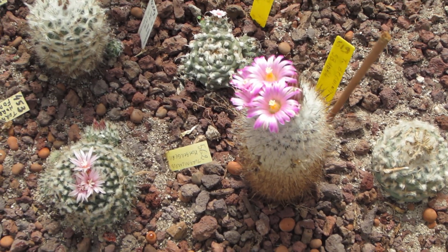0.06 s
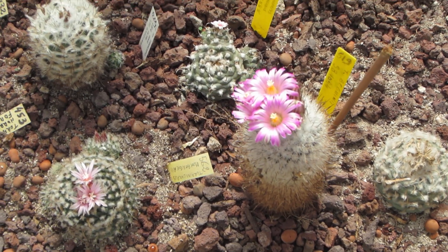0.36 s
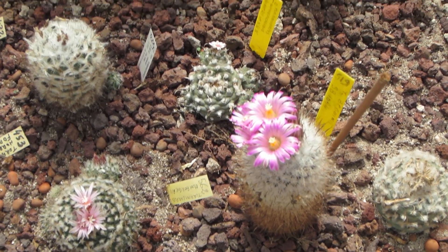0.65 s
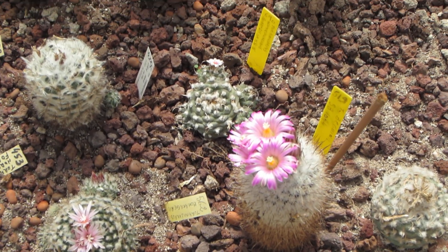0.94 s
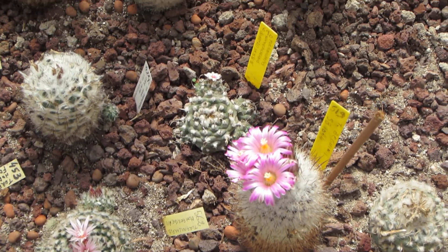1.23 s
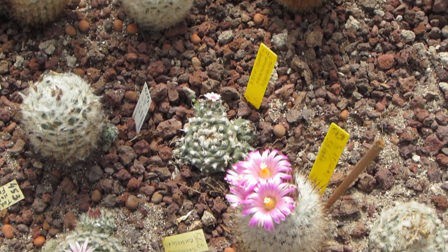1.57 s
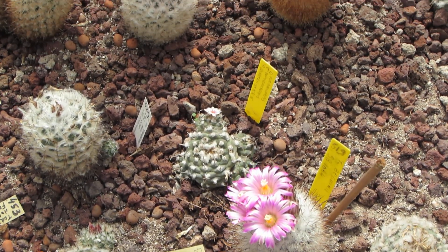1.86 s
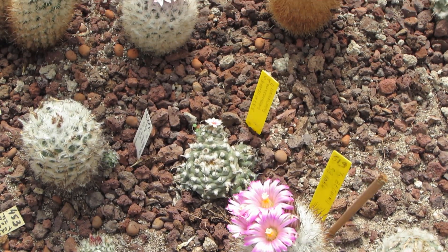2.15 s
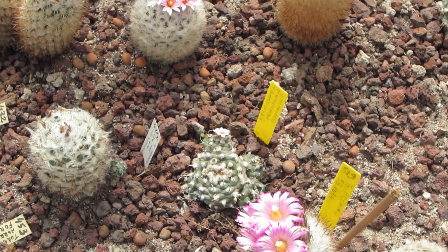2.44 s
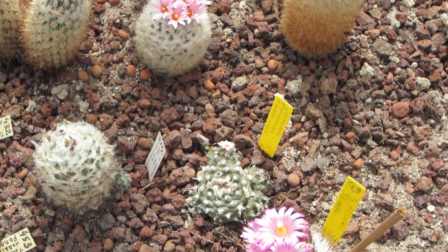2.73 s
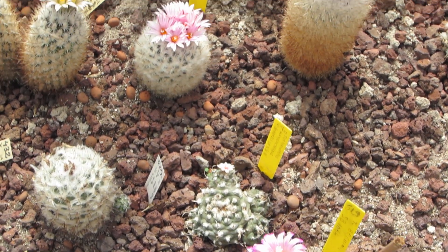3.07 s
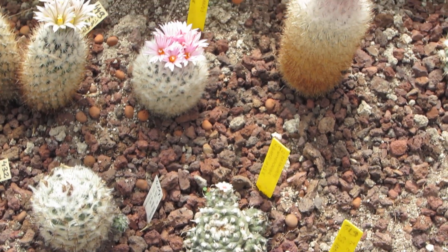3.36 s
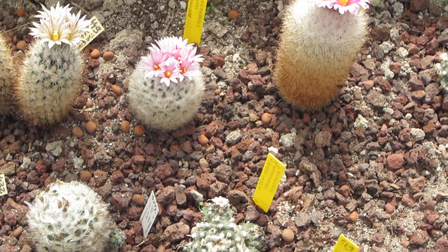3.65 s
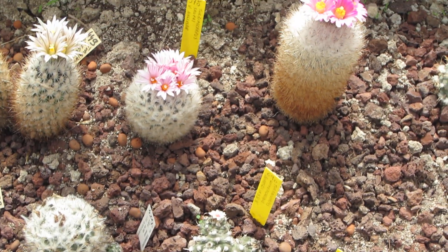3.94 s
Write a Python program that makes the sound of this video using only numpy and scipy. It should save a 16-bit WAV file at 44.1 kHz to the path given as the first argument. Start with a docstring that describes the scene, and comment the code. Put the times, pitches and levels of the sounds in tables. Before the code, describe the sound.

Low engine drone through greenhouse walls, with soft ventilation hiss, two knocks and faint ticks.

```python
"""Two engines drone through the walls of a quiet greenhouse, slowly gaining speed: low firing tones
over a rumble. Inside, ventilation hisses softly with a few fan tones. Something knocks twice further
off in the hall, a crack and a hollow ring, and tiny dry ticks sound close to the microphone.
Soft taps, one deep bump, a faint squeak and the hiss of the electronics fill in the quiet."""
import sys
import numpy as np
from scipy import signal
from scipy.fft import rfft, irfft
from scipy.io import wavfile

SR = 44100
rng = np.random.default_rng(int(sys.argv[2]) if len(sys.argv) > 2 else 0)


def transcribe(signal):
    """Save signal, clipped to [-1, 1], as a 16-bit WAV file at the path in sys.argv[1]."""
    frames = np.atleast_2d(signal).T
    limited = np.clip(frames, -1, 1)
    pcm = np.round(limited * 32767).astype(np.int16)
    wavfile.write(sys.argv[1], SR, pcm)


N = 176400
T = np.arange(N) / SR


def from_db(db):
    """Decibels to gain."""
    return 10 ** (np.asarray(db) / 20)


def unit_rms(x):
    """Scale to an RMS level of 1."""
    return x / np.sqrt(np.mean(x ** 2) + 1e-20)


def in_time(rows):
    """Join timed breakpoints by straight lines: one curve per value column."""
    times, *columns = np.transpose(rows)
    return [np.interp(T, times, column) for column in columns]


def at_hz(points, hz):
    """Read a curve on a log-frequency axis."""
    point_hz, values = np.transpose(points)
    return np.interp(np.log(hz), np.log(point_hz), values)


def drift(rate_hz):
    """A smooth random wobble with a spread of 1."""
    step = 40  # samples per control point
    pole = np.exp(-2 * np.pi * rate_hz * step / SR)
    white = rng.standard_normal(N // step + 2002)
    slow = signal.lfilter([1], [1, -2 * pole, pole * pole], white)[2000:]
    return np.interp(np.arange(N) / step, np.arange(len(slow)), unit_rms(slow))


def noise(colour):
    """Unit-level stereo noise of a given colour: centred in the bass, wide in the treble."""
    # how alike the two ears are: frequency_hz, correlation
    likeness = [(60, 0.95), (150, 0.75), (320, 0.59), (700, 0.69), (1400, 0.14), (2800, 0), (12000, 0)]
    # boost on the left and equal cut on the right: frequency_hz, gain_db
    lean = [(60, 1.5), (130, 1), (350, -0.9), (700, 1.1), (2400, 0.85), (4400, 1.5), (8000, -0.7),
            (15000, -0.3)]
    hz = np.maximum(np.arange(N // 2 + 1) * SR / N, 1)
    skirts = np.minimum(hz / colour[0][0], 1) ** 2 * np.minimum(colour[-1][0] / hz, 1) ** 2
    alike = at_hz(likeness, hz)
    mid, side = rfft(rng.standard_normal((2, N)))
    pair = np.sqrt(1 + alike) * mid + np.sqrt(1 - alike) * side * [[1], [-1]]
    eq = from_db(at_hz(colour, hz) + at_hz(lean, hz) * [[1], [-1]])
    return unit_rms(irfft(pair * skirts * eq, N))


def tone(hz):
    """A unit-level sine on a steady pitch or a pitch curve."""
    cycles = np.cumsum(hz + np.zeros(N)) / SR + rng.random()
    return np.sqrt(2) * np.sin(2 * np.pi * cycles)


def burst(start_s, attack_s, hold_s, t60_s):
    """Envelope: rise, hold, exponential decay."""
    age = np.maximum(T - start_s, 0)
    decay_db = np.maximum(-60 * np.maximum(age - hold_s, 0) / t60_s, -200)
    return (1 - np.exp(-age / attack_s)) * from_db(decay_db)


def microphone_noise():
    """Hiss and thin whines of the electronics."""
    # hiss spectrum: frequency_hz, relative_db
    hiss_colour = [(2500, 1), (4000, 1.5), (5800, 0.5), (6800, -7.5), (7900, -18), (9300, -6.5), (11500, 0),
                   (15500, 0.5)]
    # steady whines: pitch_hz, level_db
    whines = [(7867, -112), (15734, -94)]
    return from_db(-77) * noise(hiss_colour) + sum(from_db(db) * tone(hz) for hz, db in whines)


def ventilation():
    """A bed of soft rushing air with a few unsteady fan tones."""
    # airflow spectrum: frequency_hz, relative_db
    air_colour = [(120, -1.5), (170, 0), (240, 5), (350, -3), (550, -4), (680, -5.5), (770, -4),
                  (830, -6.5), (880, -4), (980, -9.5), (1100, -8.5), (1430, -16), (1630, -13), (1800, -18),
                  (2030, -20), (2200, -23), (2700, -31.5), (3350, -30.5), (3650, -37.5), (6000, -50)]
    # airflow loudness: time_s, level_db
    air_levels = [(0, -58), (1.3, -57.5), (2.1, -57), (2.8, -56.5), (3.6, -55), (4, -55.5)]
    # fan tones: pitch_hz, level_db
    fan_tones = [(424, -78), (499, -74.5), (770, -75), (874, -74.5)]
    fans = 0
    for hz, db in fan_tones:
        gain = from_db(db + 2.5 * drift(5))
        fans = fans + gain * np.array([tone(hz + 3 * drift(10)) for ear in range(2)])
    return noise(air_colour) * from_db(in_time(air_levels)[0]) + fans


def squeak():
    """One faint, brief, wavering high note."""
    return from_db(-83) * tone(3015 + 35 * drift(80)) * burst(3.835, attack_s=.008, hold_s=.09, t60_s=.25)


def bump():
    """A soft, brief swell in the deepest bass."""
    # sub-bass spectrum: frequency_hz, relative_db
    bump_colour = [(22, -4.5), (32, -2.5), (48, -5)]
    return from_db(-41) * noise(bump_colour) * burst(2.23, attack_s=.02, hold_s=.13, t60_s=.34)


def taps():
    """Light contacts further off, each with one broad resonance."""
    # soft taps: start_s, level_db, centre_hz
    tap_hits = [(0.274, -50.5, 710), (.641, -71, 5160), (2.234, -52, 1550), (2.473, -67.5, 4600),
                (3.159, -60, 3900), (3.158, -58, 1240), (3.722, -69, 4400)]
    out, width = 0, 1.247  # frequency ratio from the centre to 3 dB down
    for start_s, db, hz in tap_hits:
        colour = [(hz / width ** 2, -16), (hz / width, -3), (hz, 0),
                  (hz * width, -3), (hz * width ** 2, -24)]
        envelope = burst(start_s, attack_s=.00071, hold_s=.00073, t60_s=.025)
        out = out + from_db(db) * noise(colour) * envelope
    return out


def ticks():
    """Dry close-up clicks, many in pairs; each is three tiny contacts that leave a faint note."""
    # ticks and the weight of their two bands: start_s, low_band_db, high_band_db
    tick_hits = [(.5189, -72, -63), (.6072, -68, -64), (0.6404, -69, -63), (0.935, -64.5, -61),
                 (1.011, -64, -59), (1.2212, -75, -63), (1.3524, -65, -60), (1.4289, -64, -62),
                 (1.767, -67, -63), (1.8463, -67, -62), (2.1865, -67, -63), (2.2763, -66, -64),
                 (2.408, -67, -63), (2.4721, -59.5, -63), (2.6042, -66, -65), (2.6797, -62, -64),
                 (3.0217, -72, -60), (3.098, -65, -67), (3.1571, -59, -63), (3.4384, -70, -69.5),
                 (3.5143, -63, -66), (3.6464, -71, -58), (3.7226, -64, -64), (3.8549, -66, -60),
                 (3.9339, -65, -63)]
    start_s, low_db, high_db = np.transpose(tick_hits)
    spread_s, contact_db, left_db = .0008, -3.5, 1.2
    age = np.arange(2048) / SR
    bands = [signal.butter(2, hz, "band", fs=SR, output="sos") for hz in ((3200, 6460), (8900, 15200))]
    low, high = (signal.sosfilt(np.vstack([sos, sos]), signal.unit_impulse(len(age))) for sos in bands)
    note = np.sin(2 * np.pi * 5300 * age) * from_db(-17 - 60 * age / .018)  # dies in 18 ms
    delays_s = spread_s * (np.arange(3) + .5 * rng.random((len(start_s), 2, 3))) / 3
    onsets = ((start_s[:, None, None] + delays_s) * SR).astype(int)  # tick, ear, contact
    out = 0
    for shape, db in ((low / np.abs(low).max() + note, low_db), (high / np.abs(high).max(), high_db)):
        contacts = np.zeros((2, N))
        for ear in range(2):
            contacts[ear, onsets[:, ear]] = from_db(db + contact_db)[:, None]
        out = out + signal.fftconvolve(contacts, shape[None])[:, :N]
    return out * from_db([[left_db], [-left_db]])


def knocks():
    """Two knocks: a short crack, then a hollow body that swells and dies away in the hall."""
    # knocks: start_s, body_db, crack_db, cutoff_hz, swell_s, hold_s, t60_s, mode_tilt_db_per_octave
    knock_hits = [(1.6014, -41, -50, 14000, 0.019, 0.018, 0.43, -3.5),
                  (2.9626, -47.5, -54, 1050, 0.0025, 0.024, 0.19, 6.5)]
    # resonances of the knocked object: pitch_hz, relative_db
    knock_modes = [(335, -6), (425, 1.5), (497, 0), (585, -8), (650, -3.5), (824, -5)]
    # spectrum of the hollow body and its hall tail: frequency_hz, relative_db
    body_colour = [(150, -12.5), (300, 6.5), (450, 4), (750, -5), (1100, -9.5), (2000, -30.5), (3000, -35),
                   (6000, -48), (14000, -45)]
    # spectrum of the attack: frequency_hz, relative_db
    crack_colour = [(200, -13), (500, -6), (1100, 9), (1500, 3), (2000, 3), (2900, -18.5), (4500, -21),
                    (6200, -17), (8000, -32), (13000, -15), (16000, -24)]
    modes_db, hall_db = -3.5, -13  # against the body
    out, crack, body, hall = 0, noise(crack_colour), noise(body_colour), noise(body_colour)
    for start_s, body_db, crack_db, cutoff_hz, swell_s, hold_s, t60_s, tilt in knock_hits:
        modes = sum(from_db(db + tilt * np.log2(hz)) * tone(hz + 5 * drift(17.9))
                    for hz, db in knock_modes)
        ring = unit_rms(body + from_db(modes_db) * unit_rms(modes))
        ring *= burst(start_s, swell_s, hold_s, t60_s)
        tail = from_db(hall_db) * hall * burst(start_s, attack_s=.018, hold_s=hold_s, t60_s=.9)
        snap = from_db(crack_db) * crack * burst(start_s, attack_s=.00058, hold_s=.011, t60_s=.089)
        hit = from_db(body_db) * (ring + tail) + snap
        softening = signal.butter(2, cutoff_hz, fs=SR, output="sos")  # a softer knock is duller
        out = out + signal.sosfilt(softening, hit + 1e-18)
    return out


def engines():
    """Only the lowest firing harmonics and a rumble pass the walls; each swells and fades on its own."""
    # first engine's speed: time_s, firing_hz
    firing_rates = [(0, 65.02), (.8, 65.9), (1.5, 65.38), (2.4, 66.87), (3.0, 68.44), (3.5, 70.34),
                    (3.75, 71.8), (4, 71.1)]
    # its first three harmonics, a table each: time_s, level_db
    first_levels = [(0.0, -45.5), (0.1, -96), (0.13, -49), (1.14, -37.5), (1.44, -46), (1.77, -44),
                    (1.8, -66), (1.85, -40), (2.14, -38.5), (2.29, -46.5), (2.34, -40.5), (2.65, -36.5),
                    (3.19, -45.5), (3.22, -55), (3.31, -38.5), (3.51, -31.5), (3.64, -36.5), (4.0, -37.5)]
    second_levels = [(0, -72), (.45, -65), (0.619, -54.5), (1.15, -55), (1.4, -60.5), (2.9, -69),
                     (3.3, -51.5), (3.52, -50.5), (3.679, -61.5), (3.82, -48), (4, -60.5)]
    third_levels = [(0, -75), (2.3, -66.5), (2.7, -58.5), (2.93, -52), (3.3, -54.5), (3.55, -55.5),
                    (3.749, -47), (4, -59.5)]
    # the other engine, a single tone: time_s, firing_hz, level_db
    other_engine = [(1.2, 124, -64), (1.55, 122.9, -53), (1.85, 122.6, -48), (2.1, 125.2, -44),
                    (2.42, 126.8, -39), (2.54, 129.4, -46.5), (2.63, 129, -42), (2.78, 131.3, -54.5),
                    (2.9, 134.3, -45.5), (3.05, 136, -68)]
    # rumble spectrum: frequency_hz, relative_db
    rumble_colour = [(15, -12), (26, -2.5), (32, -6), (40, -1.5), (50, 4.5), (65, -3), (88, -3), (105, -9),
                     (135, -9.5), (165, -9.5), (190, -16.5), (350, -32)]
    # rumble loudness: time_s, level_db
    rumble_levels = [(0, -52.5), (.5, -49), (1.3, -46), (1.75, -47.5), (1.92, -47.5), (2.1, -44.5),
                     (2.55, -44.5), (3.22, -45.5), (3.6, -47.5), (4, -44)]
    waver_hz, waver_db, left_db = .2, .4, .55
    firing_hz = in_time(firing_rates)[0] + waver_hz * drift(5.1)
    drone = 0
    for harmonic, levels in enumerate((first_levels, second_levels, third_levels), start=1):
        drone = drone + tone(harmonic * firing_hz) * from_db(in_time(levels)[0] + waver_db * drift(11))
    other_hz, other_db = in_time(other_engine)
    drone = drone + tone(other_hz) * from_db(other_db + waver_db * drift(18))
    rumble = noise(rumble_colour) * from_db(in_time(rumble_levels)[0])
    return drone * from_db([[left_db], [-left_db]]) + rumble


def scene():
    """The engine drone mixed with the air and the small sounds of the greenhouse."""
    return engines() + bump() + ventilation() + knocks() + taps() + squeak() + ticks() + microphone_noise()


def record(dry):
    """A steep low-pass takes off the very top."""
    cutoff_hz = 15850
    return signal.sosfilt(signal.ellip(12, .1, 80, cutoff_hz, fs=SR, output="sos"), dry)


dry = scene()
out = record(dry)
transcribe(out)
```